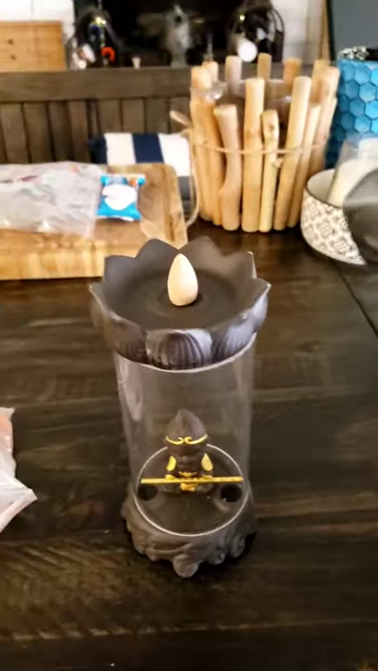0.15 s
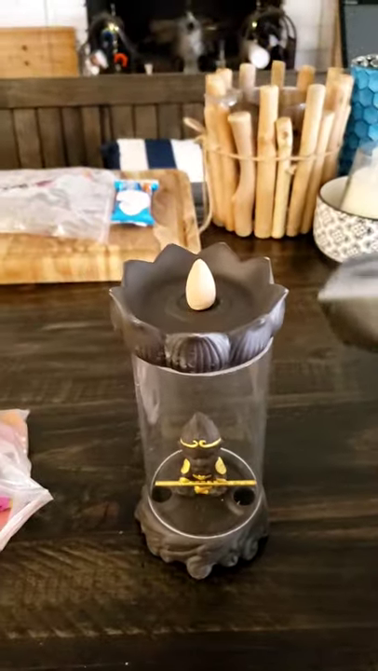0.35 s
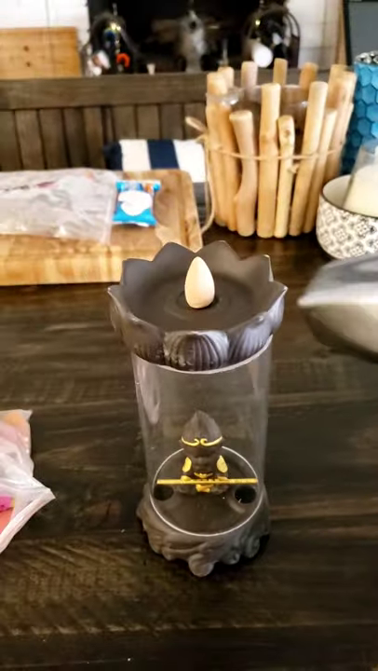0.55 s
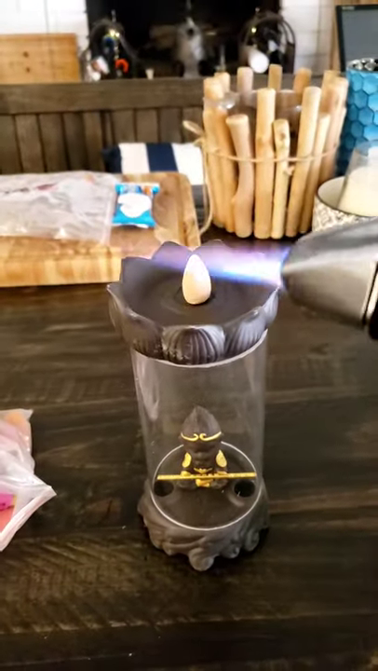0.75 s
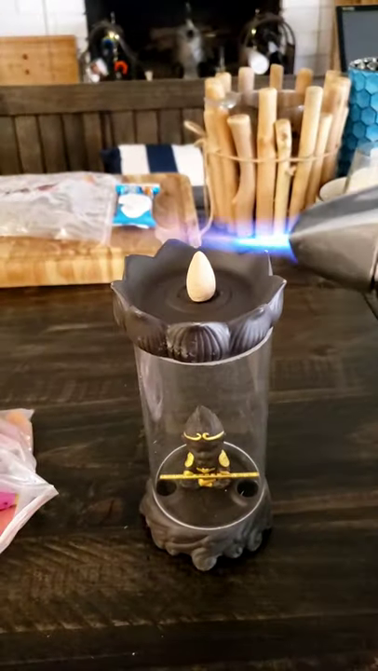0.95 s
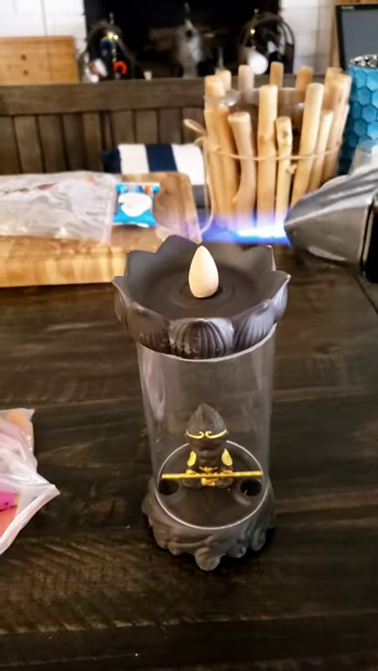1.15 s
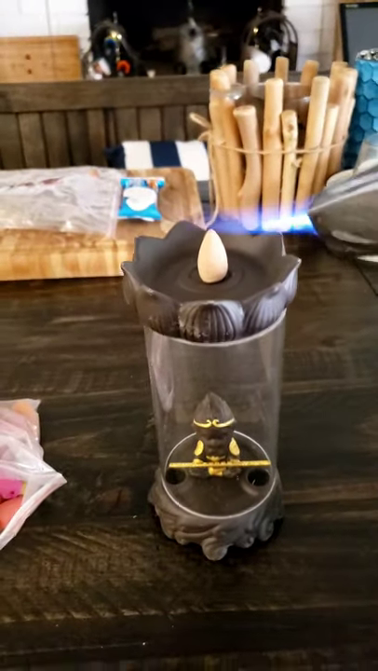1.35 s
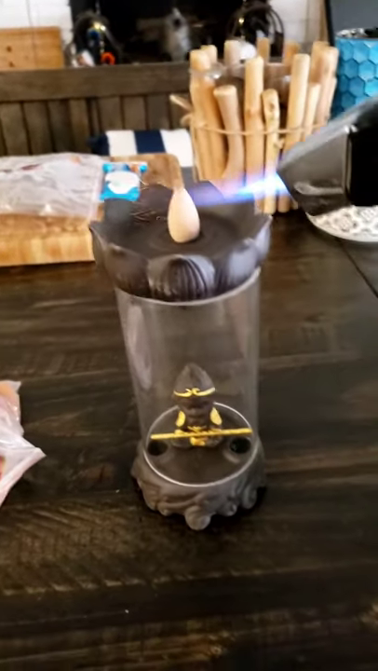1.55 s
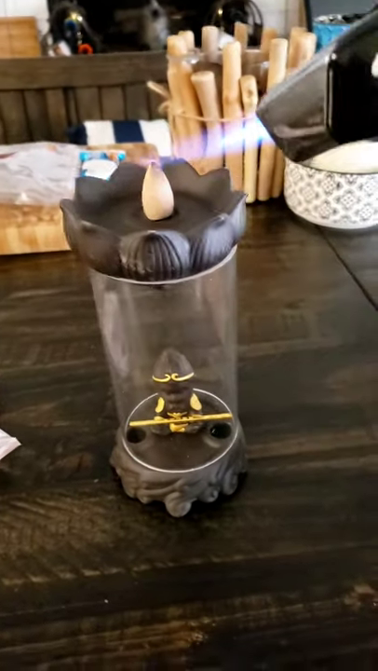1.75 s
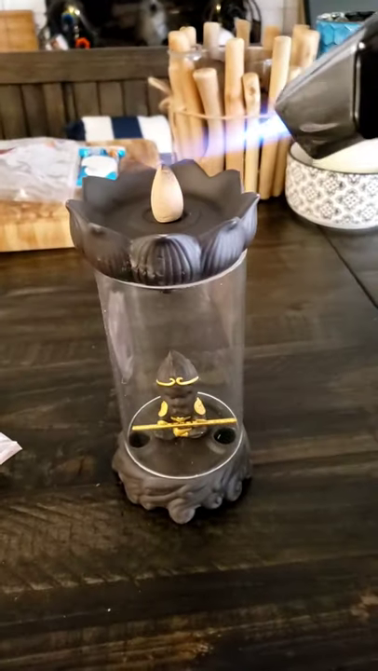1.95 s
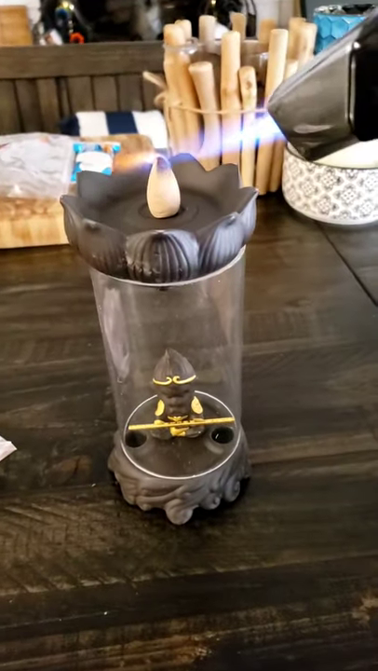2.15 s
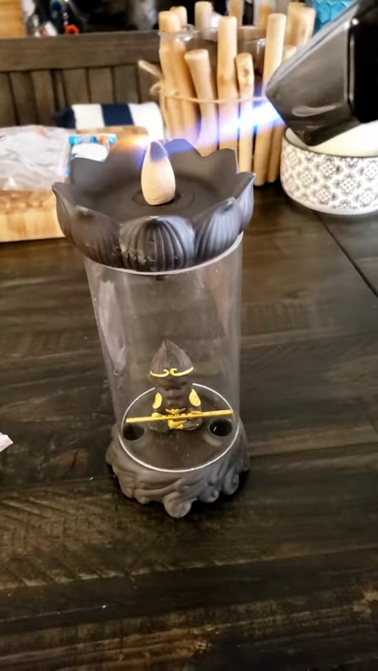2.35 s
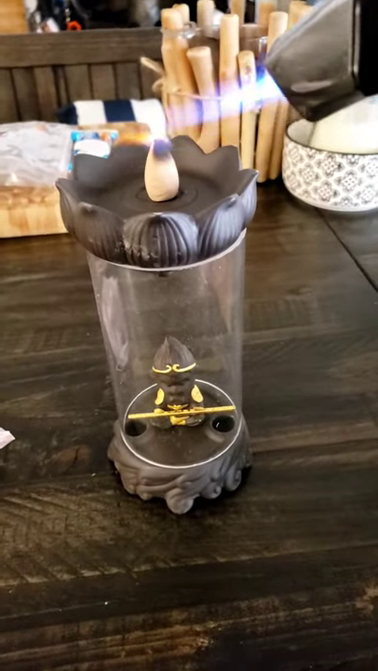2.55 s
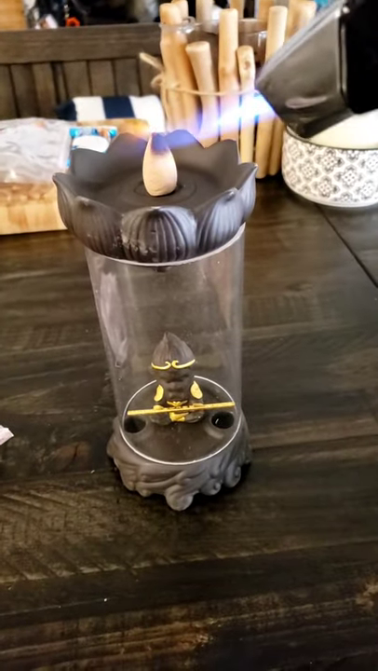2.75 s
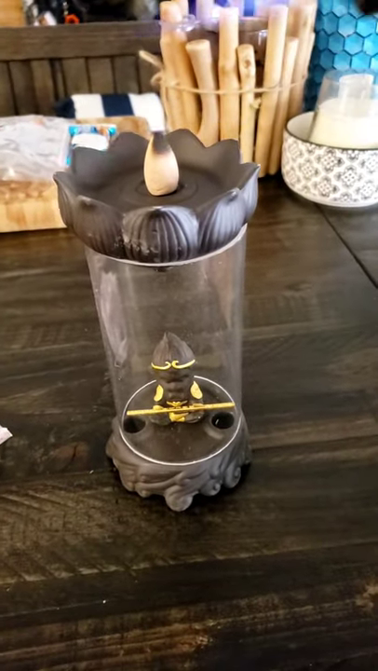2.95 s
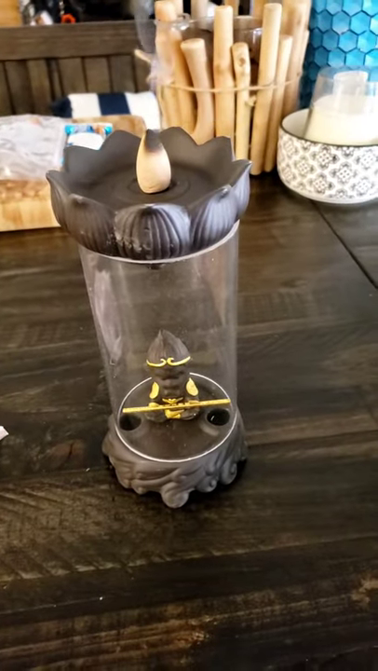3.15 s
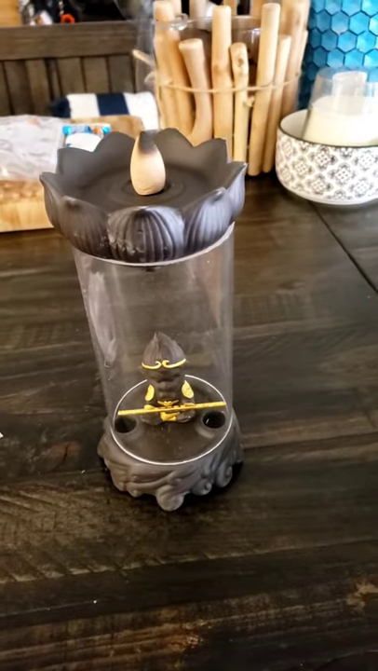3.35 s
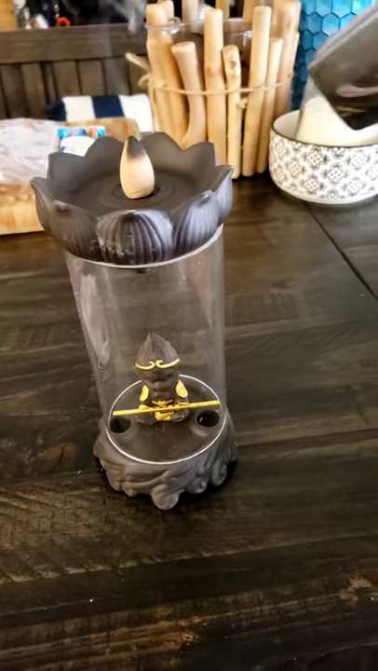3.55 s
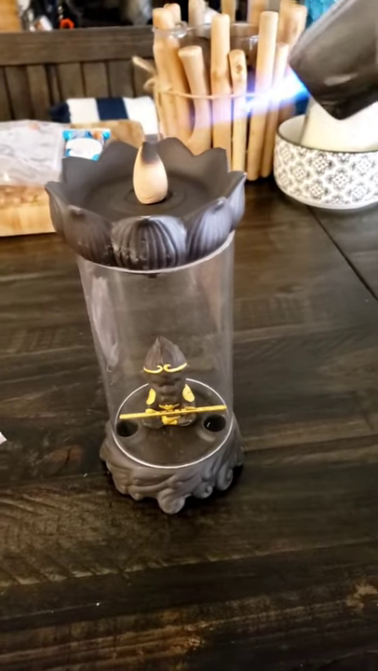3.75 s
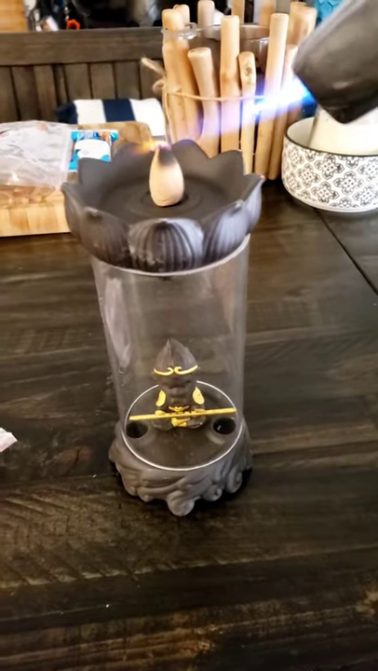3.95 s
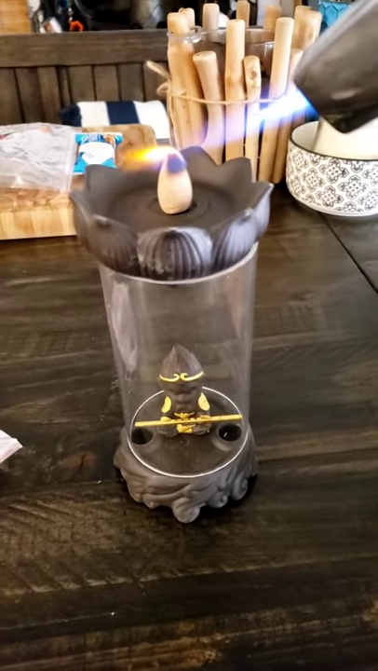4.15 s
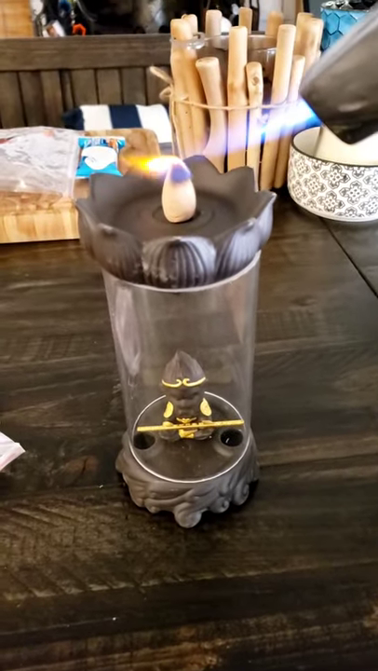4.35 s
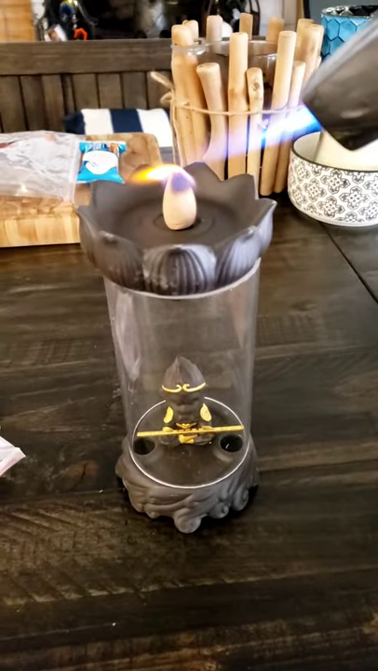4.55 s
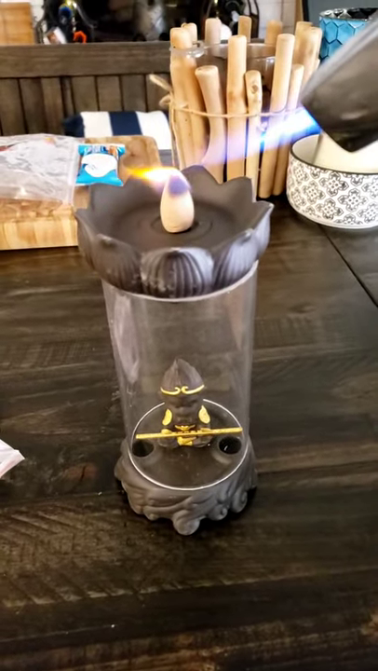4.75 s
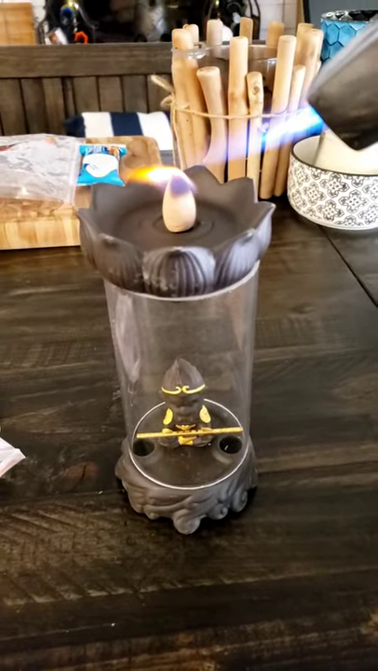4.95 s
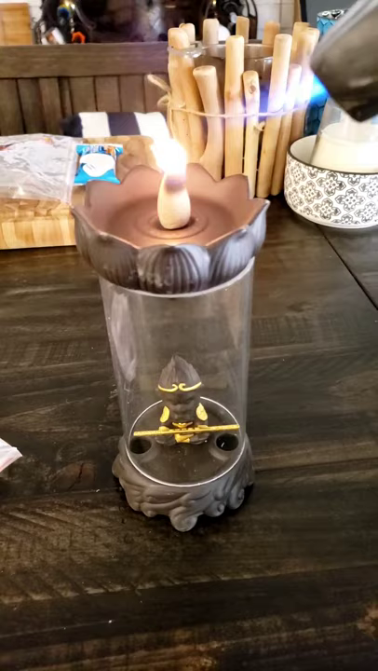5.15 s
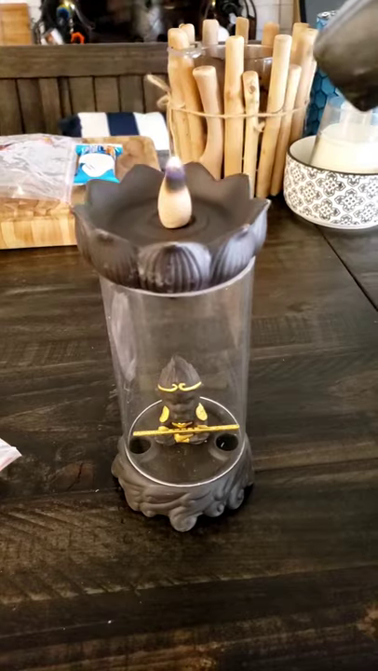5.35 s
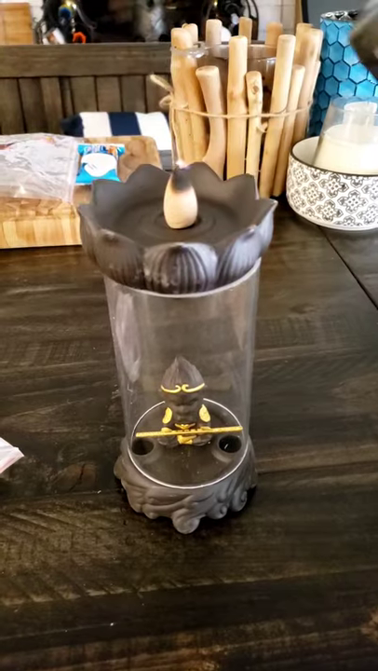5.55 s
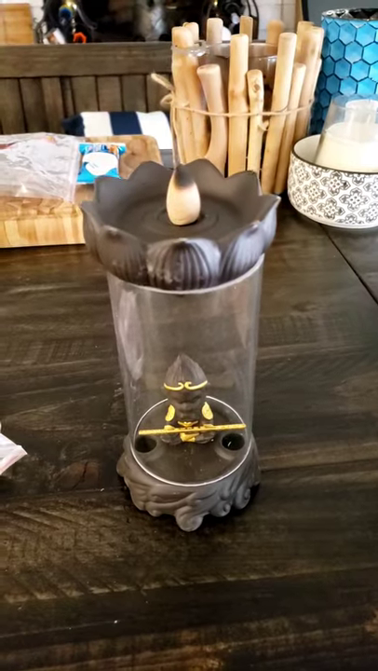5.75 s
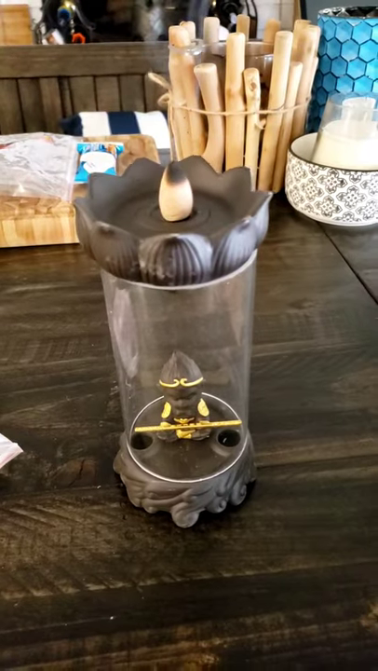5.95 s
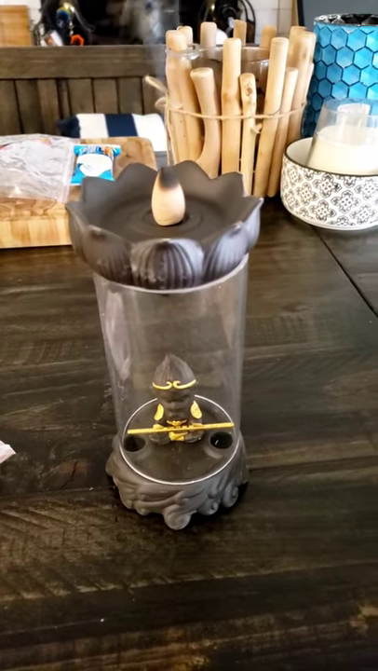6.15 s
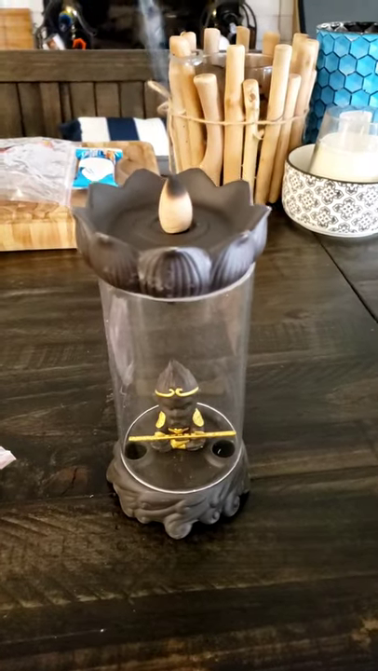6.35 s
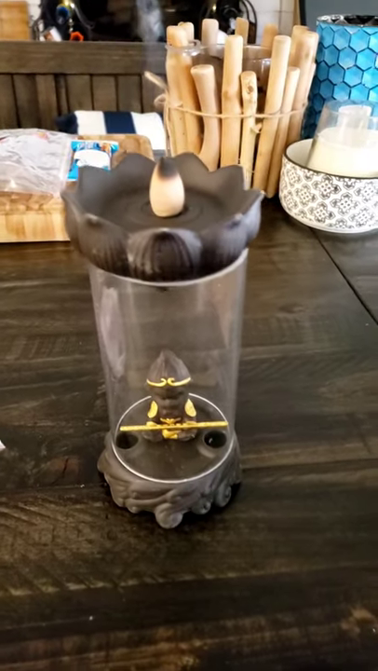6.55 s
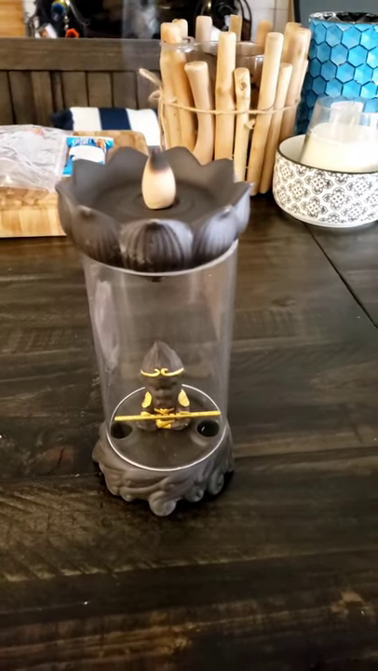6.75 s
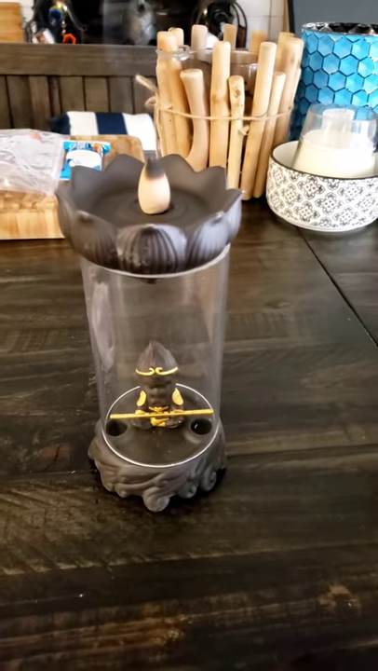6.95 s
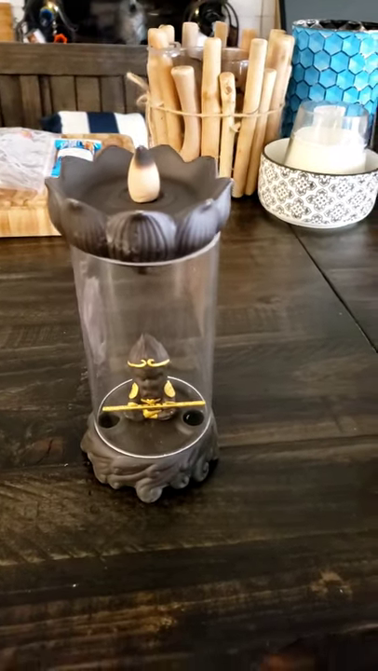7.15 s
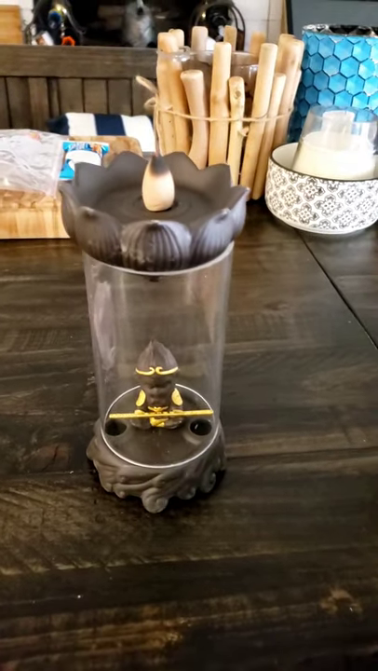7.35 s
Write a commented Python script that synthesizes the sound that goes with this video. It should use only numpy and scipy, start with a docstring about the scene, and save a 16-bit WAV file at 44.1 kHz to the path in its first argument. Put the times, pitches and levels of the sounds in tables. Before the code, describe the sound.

A low, beating machine hum with rumble and faint air fills a lively room, captured in stereo by a nearby phone. Faint handling taps come at 0.1 s. Gas hisses from 0.3 to 0.6 s, with small lever clicks and a hard metallic snap at 0.39 that does not light; a click and dull knock follow at 0.59. Around 0.7 a very high whistle chirps, then at 0.75 a sharp snap and deep pop ignite a rough, breathy jet, strongest at first, with a thin ringing whine. Clicks at 2.96, 3.06 and 3.12 shut it abruptly. At 3.68 a fainter whistle, then a softer snap and pop at 3.76, start a quieter roar. Clicks from 5.02 lead to its cutoff at 5.28. The hum, pushed down by loud moments, swells back from around 5.3 to 6.2 s; a faint rub and tap come near 7.1 to 7.3.

```python
"""Over a low machine hum, a butane jet lighter nears an incense cone on a wooden table, left of a phone.
Gas hisses and the piezo trigger snaps in vain; then a whistle, a snap and a pop light a roaring jet.
The trigger clicks back and it dies; another whistle and snap light it again, until more clicks end it.
A live room answers each snap, made of ringing noise bursts; flame and gas are coloured noise.
Loud moments make the phone turn its gain down, so the hum sinks and later swells back."""
import sys
import numpy as np
from scipy import signal
from scipy.fft import rfft, irfft
from scipy.io import wavfile
from scipy.ndimage import uniform_filter1d, map_coordinates

SR = 44100
rng = np.random.default_rng(int(sys.argv[2]) if len(sys.argv) > 2 else 0)


def master_out(mix):
    """Clip the mix to full scale and print it as 16-bit PCM to the path in sys.argv[1]."""
    frames = np.transpose(np.atleast_2d(mix))
    ceiling = np.clip(frames, -1, 1)
    pcm = np.round(ceiling * 32767).astype(np.int16)
    wavfile.write(sys.argv[1], SR, pcm)


N = 327222
TIME = np.arange(N) / SR
FREQ = np.fft.rfftfreq(N, 1 / SR)


def amp(db):
    """Decibels to gain."""
    return 10 ** (np.asarray(db) / 20)


def unit(x):
    """Scale to rms 1."""
    return x / np.sqrt(np.mean(x ** 2))


def curves(table):
    """The columns of a table, joined by straight lines in time."""
    s, *columns = np.transpose(table)
    return [np.interp(TIME, s, column) for column in columns]


def spectrum(points, hz=FREQ):
    """Colour points joined on a log-frequency axis."""
    f, value = np.transpose(points)
    return np.interp(np.log(hz + 1), np.log(f), value)


def lifts(modes, hz=FREQ):
    """Decibels added by resonances."""
    return sum(db / (1 + (2 * (hz - f) / width) ** 2) for f, width, db in modes)


def noise(db):
    """Noise of rms 1 with the given colour."""
    white = rng.standard_normal(N)
    return unit(irfft(rfft(white) * amp(db), N))


def walk(rate):
    """Smooth random drift of rms 1 that moves about rate times a second."""
    return noise(-20 * np.log10(1 + (FREQ / rate) ** 4))


def narrow(hz, width_hz):
    """Turbulence caught in one sharp resonance whose pitch may move; rms about 1."""
    slow = -10 * np.log10(1 + (2 * FREQ / width_hz) ** 4)
    phase = 2 * np.pi * np.cumsum(hz * np.ones(N)) / SR
    return noise(slow) * np.cos(phase) + noise(slow) * np.sin(phase)


def envelope(start_s, end_s, attack_s, fade_db_per_s):
    """Gain that rises from the start, holds, and fades after the end."""
    rise = np.clip((TIME - start_s) / attack_s, 0, 1)
    return rise * amp(-fade_db_per_s * np.clip(TIME - end_s, 0, 1))


def delay(x, ms):
    """Read a sound a fixed or moving time late."""
    return map_coordinates(x, [np.arange(N) - ms * SR / 1000], order=3)


def ring(db):
    """Causal impulse response of a colour, by way of its cepstrum; unit energy."""
    cepstrum = irfft(np.log(amp(db)))
    half = len(cepstrum) // 2
    # folding the cepstrum forward in time gives minimum phase
    folded = np.r_[cepstrum[0], 2 * cepstrum[1:half], np.zeros(half)]
    response = irfft(np.exp(rfft(folded)))[:half]
    return response / np.linalg.norm(response)


def blow(ms, colour_db):
    """A dying rattle of tiny contacts rings a body; a longer rattle carries more energy."""
    t = np.arange(SR // 6) / SR
    contacts = rng.standard_normal(len(t)) * np.exp(-1000 * t / ms)
    contacts = contacts / np.linalg.norm(contacts) * np.sqrt(ms * SR / 2000)
    return signal.fftconvolve(contacts, ring(colour_db))


def add(track, s, sound):
    """Mix a short sound into a track at time s."""
    start = max(int(s * SR), 0)
    track[..., start:start + sound.shape[-1]] += sound[..., :N - start]


def pan(db):
    """Left and right gains for a level difference."""
    return amp(np.array([[db], [-db]]) / 2)


def ports(x, lag_ms=.27):
    """The right port hears a source on the left a little later."""
    return np.array([x, delay(x, lag_ms)])


# colour of the level difference between the ports: (frequency [Hz], left minus right [dB])
PORT_BALANCE = [(110, 4), (380, 0.5), (700, 12), (1300, 4), (2400, 7), (4400, 3.5), (8100, 2),
                (14500, -3.5)]


def sides(stereo, share=1):
    """The left port is stronger in the middle range, the right one in the top."""
    half_difference_db = np.outer([1, -1], spectrum(PORT_BALANCE)) / 2
    return irfft(rfft(stereo) * amp(share * half_difference_db), N)


# how long the room rings: (frequency [Hz], time to fall 60 dB before the early lift [s])
ROOM_DECAY = [(150, 0.095), (600, 0.49), (2500, 0.5), (6000, 0.58), (13000, 0.43)]


def room(x, build_s=0.0051, early_db=4, early_s=.03):
    """Diffuse noise tail: strong early reflections, then a decay that is shortest in the bass."""
    hz, s, cells = signal.stft(rng.standard_normal((2, SR)), SR, nperseg=256)
    decay = np.exp(-np.log(1000) * s / spectrum(ROOM_DECAY, hz)[:, None])
    tail = signal.istft(cells * decay, SR)[1]
    t = np.arange(tail.shape[1]) / SR
    build = 1 - np.exp(-(t / build_s) ** 2)
    tail = tail * build * amp(early_db * np.exp(-t / early_s))
    # the left tail has unit energy
    return signal.fftconvolve(x[None], tail / np.linalg.norm(tail[0]), axes=1)[:, :N]


# the jet burns: (lights [s], valve shuts [s], level [dB], extra level at first [dB])
BURNS = [(.746, 3.129, -42, 5.5), (3.76, 5.285, -44.5, 1)]
# turbulent roar of the flame, hiss of the gas: (frequency [Hz], relative level [dB])
ROAR_COLOUR = [(50, -23.5), (120, 6.5), (230, 4.5), (350, -4), (500, -7.5), (700, -5.5), (1000, -4),
               (1600, -3.5), (2300, -8), (4000, -18), (9000, -26)]
HISS_COLOUR = [(800, -19.5), (2000, 4.5), (3200, -1.5), (5500, 1.5), (7000, -6), (8200, 0), (10200, -3),
               (11500, -9), (12800, 1), (14300, -8.5)]
# resonances of the burner tube: (frequency [Hz], width [Hz], lift [dB])
BURNER_TUBE = [(1063, 240, 7.5), (1440, 220, 5), (2780, 130, 7.5), (5520, 720, 5), (11700, 400, 7.5)]
# the gap between flame and holder rings at a pitch that follows the hand: (time [s], pitch [Hz])
GAP_PITCH = [(1.2, 3400), (1.65, 3980), (3.1, 3906), (3.9, 3800), (4.6, 3740), (5.3, 3800)]
# the flame catches fast, sounds louder at first and eases down slowly, and dies with a last spit of gas
CATCH_S, EASE_S, DIE_DB_PER_S, SPIT_DB, SPIT_S = 0.018, 0.57, 418, 5.5, 0.03


def jet(flutter_db=1.02, echo=0.14, echo_cycles=3.5, hiss_db=-11, gap_db=-19.0, gap_width_hz=170,
        roar_room_db=-6, hiss_room_db=-2):
    """Flame roar and gas hiss pass through the burner tube; the gap to the holder adds echo and ring."""
    burn, gas = np.zeros(N), np.zeros(N)
    for start, end, db, flare_db in BURNS:
        easing = np.exp(-np.maximum(TIME - start, 0) / EASE_S)
        flame = envelope(start, end, CATCH_S, DIE_DB_PER_S) * amp(db + flare_db * easing)
        spit = amp(SPIT_DB * np.exp(-np.abs(TIME - end) / SPIT_S))
        burn += flame
        gas += flame * spit
    gap_hz, tube = curves(GAP_PITCH)[0], lifts(BURNER_TUBE)
    roar = burn * noise(spectrum(ROAR_COLOUR) + tube) * amp(flutter_db * walk(60))
    hiss = gas * noise(spectrum(HISS_COLOUR) + tube) * amp(hiss_db + .5 * walk(15))
    echo_ms = 1000 * echo_cycles / gap_hz
    # the near echo comes back inverted
    roar = roar - echo * delay(roar, echo_ms)
    hiss = hiss - echo * delay(hiss, echo_ms)
    gap = burn * narrow(gap_hz, gap_width_hz) * amp(gap_db)
    # the jet points at the things on the table, so most of its reflections come early
    reflected = room(amp(roar_room_db) * roar + amp(hiss_room_db) * hiss, early_db=8)
    return sides(ports(roar + hiss + gap) + reflected)


# unlit gas escapes as the trigger travels:
# (valve opens [s], flow starts to fade [s], level [dB], opening time [s])
LEAKS = [(0.317, 0.6, -41, 0.066), (0.688, .742, -45.5, .04), (3.679, 3.77, -53, 0.038)]
# the barely open valve whistles, each time a chirp and then a stronger note:
# (time [s], length before the fade [s], level at full rise [dB], fade [dB/s])
WHISTLES = [(.684, .006, -48, 1499), (0.705, 0.0077, -30.5, 900), (3.682, 0.011, -42, 2497.5),
            (3.702, 0.011, -38, 518)]
WHISTLE_HZ, WHISTLE_ATTACK_S, LEAK_FADE_DB_PER_S = 11420, .007, 421


def valve(waver_hz=110, tube_db=-9, tube_hz=2790, tube_width_hz=260, room_db=-10):
    """Unlit gas hisses, sounds the burner tube and whistles on the edge of the nozzle."""
    leaking = sum(amp(db) * envelope(start, end, opening_s, LEAK_FADE_DB_PER_S)
                  for start, end, db, opening_s in LEAKS)
    whistling = sum(amp(db) * envelope(s, s + length, WHISTLE_ATTACK_S, fade)
                    for s, length, db, fade in WHISTLES)
    whistle_hz = WHISTLE_HZ + waver_hz * walk(400)
    tone = np.sqrt(2) * np.sin(2 * np.pi * np.cumsum(whistle_hz) / SR)
    leak = unit(noise(spectrum(HISS_COLOUR)) + amp(tube_db) * narrow(tube_hz, tube_width_hz))
    gas = leak * leaking * amp(2 * walk(120)) + tone * whistling * amp(1.5 * walk(300))
    return ports(gas, lag_ms=.28) + amp(room_db) * room(gas)


def strikes(hits, shape, modes, scatter, size=2048, lag_ms=.2):
    """Parts of the lighter strike its case; the table scatters the snap and the room answers."""
    hz = np.fft.rfftfreq(size, 1 / SR)
    near, scattered, far = np.zeros((2, N)), np.zeros((2, N)), np.zeros(N)
    for s, db, ms, tilt_db, room_db, pan_db in hits:
        tilt = tilt_db * np.log2(np.maximum(hz, 500) / 3000)
        colour = spectrum(shape, hz) + lifts(modes, hz) + tilt
        snap, left, right = (amp(db) * blow(ms, colour) for _ in range(3))
        add(near, s, snap * pan(pan_db))
        add(scattered, s, scatter * np.array([left, right]) * pan(pan_db))
        # the room gathers the snap from all directions, which evens out its colour
        add(far, s, amp(room_db) * np.linalg.norm(snap) * ring(colour))
    direct = np.array([near[0], delay(near[1], lag_ms)])
    return (direct + scattered) / np.hypot(1, scatter) + room(far)


# the piezo hammer fires: (time [s], level [dB], rattle time constant [ms],
# treble tilt [dB/octave], room [dB], left minus right [dB])
SNAPS = [(.3868, -5, 1.65, 1, 1, -0.5), (.7463, -6.5, 2.84, 1.1, 0, -7.5), (3.7595, -13, 2.56, 1.34, 5, 3)]
# colour of the hammer: (frequency [Hz], relative level [dB])
HAMMER_COLOUR = [(150, -9), (500, -11.5), (800, -11.5), (1300, -1), (2300, 5), (4200, 0.5), (5500, -3.5),
                 (9500, -6), (12000, 0), (14500, -1.5)]
# modes of the lighter's case: (frequency [Hz], width [Hz], lift [dB])
CASE_MODES = [(1180, 310, 6.3), (1916, 99, 6), (2460, 230, 8.2), (3180, 180, 4.5), (4460, 200, 1.3),
              (6100, 130, 3)]


def hammer():
    """The sprung piezo hammer hits and rings the case."""
    return sides(strikes(SNAPS, HAMMER_COLOUR, CASE_MODES, scatter=1.0), share=0.33)


# the trigger lever slips and springs back: (time [s], level [dB], rattle time constant [ms],
# treble tilt [dB/octave], room [dB], left minus right [dB])
CLICKS = [(0.3247, -49, 2.3, 4, -9, -9), (.3315, -39.5, 2.5, 0, -7, 10), (.346, -34, 4.7, 11, 7, 1),
          (.5905, -20.5, 2.9, -0.5, -5.5, 8.5), (2.9595, -18, 1.4, -1, -8, 2.5),
          (3.059, -26.5, 4.2, -3.5, -6, 4.5), (3.117, -14, 2, 0, -20.5, 4.5),
          (3.127, -28.5, 6, -4, -9.5, 5), (5.0208, -35, 2.3, -4.5, -6, 19.5),
          (5.1488, -25.5, 1.4, -0.5, -7, 6), (5.209, -38.5, 4, -2, -17, 13),
          (5.2757, -22.5, 3, -1, -16.5, 8)]
# colour of the lever: (frequency [Hz], relative level [dB])
LEVER_COLOUR = [(150, -7), (600, -10.5), (1500, -4.5), (2300, 1), (3400, -0.5), (5000, -3), (6500, -5.5),
                (9500, -8.5), (12000, -2.5), (14500, -9)]
# modes of the lever: (frequency [Hz], width [Hz], lift [dB])
LEVER_MODES = [(1070, 180, 8), (1953, 140, 9), (2883, 400, 12), (4600, 330, 3)]


def lever():
    """The trigger lever clicks with short rattles at its own modes."""
    return strikes(CLICKS, LEVER_COLOUR, LEVER_MODES, scatter=0.93)


# low thumps of the hand, the trigger and the catching gas:
# (time [s], level [dB], pitch [Hz], decay time constant [ms], left minus right [dB])
POPS = [(.101, -38.5, 210, 1.07, -16), (0.3875, -20.5, 54.75, 4.7, -0.5), (0.748, -8, 80.5, 4.6, 3.5),
        (3.7598, -22.5, 247, 2.4, 2.5), (3.764, -11.5, 73.6, 3.8, 6.5)]
# colour of the puff that comes with a pop: (frequency [Hz], relative level [dB])
PUFF_COLOUR = [(30, -10.5), (60, -0.5), (100, -5), (135, 2.5), (190, -19.5), (260, -13.5), (340, -25),
               (450, -26), (1500, -58)]


def pops(puff_db=-10, puff_ms=18, room_db=-14, size=8192):
    """A few swelling and dying swings of air pressure, with a turbulent puff."""
    t, track = np.arange(SR // 5) / SR, np.zeros((2, N))
    puff = spectrum(PUFF_COLOUR, np.fft.rfftfreq(size, 1 / SR))
    for s, db, hz, ms, pan_db in POPS:
        age = 1000 * t / ms
        swing = -age ** 2 * np.exp(-age) * np.sin(2 * np.pi * hz * t)
        add(track, s, amp(db) * swing * pan(pan_db))
        add(track, s, amp(db + puff_db) * blow(puff_ms, puff) * pan(pan_db))
    return track + amp(room_db) * room(track.mean(axis=0))


# soft knocks of handling:
# (time [s], level [dB], rattle time constant [ms], ring pitch [Hz], sharpness [Q])
KNOCKS = [(0.112, -43.5, 2.5, 1500, 4.2), (0.298, -58.5, 3, 1500, 1.5), (0.344, -30.5, 3.2, 1100, 1.2),
          (0.552, -29.5, 3.8, 1200, 0.76), (0.592, -22.5, 2.7, 1280, 2.4), (0.617, -41, 6.2, 1300, 2.2),
          (3.554, -57.5, 1.8, 2000, 0.91), (3.581, -48, 5.8, 1130, 0.86), (5.6207, -53.5, 3.6, 1800, 2.3),
          (7.2635, -54.5, 5, 1200, 2.3)]
# a faint hollow rub of the fingers
RUB_START_S, RUB_END_S, RUB_DB, RUB_ATTACK_S, RUB_FADE_DB_PER_S = 7.07, 7.17, -72.5, 0.049, 219.5


def knocks(size=2048, room_db=-9, pan_db=5, overtone=1.7, overtone_db=-12, rub_hz=830, rub_width_hz=90):
    """Fingers shift and brush: dull blows with one ring and a weaker overtone, and a short rub."""
    hz = np.fft.rfftfreq(size, 1 / SR) + 1
    rubbing = envelope(RUB_START_S, RUB_END_S, RUB_ATTACK_S, RUB_FADE_DB_PER_S)
    track = narrow(rub_hz, rub_width_hz) * amp(RUB_DB) * rubbing
    for s, db, ms, ring_hz, q in KNOCKS:
        low, high = (1 / (1 + (q * (hz / f - f / hz)) ** 2) for f in (ring_hz, overtone * ring_hz))
        # the last term is a broad floor under both rings
        colour = 20 * np.log10(low + amp(overtone_db) * high + amp(-42.5))
        add(track, s, amp(db) * blow(ms, colour))
    return (ports(track) + amp(room_db) * room(track)) * pan(pan_db)


# machine hum: (frequency [Hz], rms level before drift and pan [dB])
HUM_TONES = [(59.3, -49), (83.8, -50.5), (89.4, -51.5), (134.6, -60), (168, -66), (306.8, -76),
             (360.3, -72.5), (431, -78)]
# hum and rumble ease off a little: (time [s], level [dB])
HUM_DRIFT = [(0, 2.3), (4.5, 1), (7.42, -1)]
# room rumble and air: (frequency [Hz], relative level [dB])
RUMBLE_COLOUR = [(20, -13), (35, -19.5), (55, -2), (75, 6), (105, -3), (140, -3.5), (200, -12.5),
                 (300, -15), (420, -24.5), (700, -30.5), (1500, -59)]
AIR_COLOUR = [(200, -7), (800, 7.5), (1300, -0.5), (2800, -1), (5000, -8), (8000, -9), (12000, -4),
              (14500, -4)]


def background(rumble_db=-53.5, air_db=-74.0, side_db=-8, pan_db=2.0):
    """Steady motor tones beat against each other over a low rumble and faint air."""
    hum = np.zeros(N)
    for hz, db in HUM_TONES:
        turns = np.cumsum(hz + .15 * walk(1)) / SR + rng.random()
        hum += np.sqrt(2) * amp(db + walk(2)) * np.sin(2 * np.pi * turns)
    middle, side = noise(spectrum(RUMBLE_COLOUR)), noise(spectrum(RUMBLE_COLOUR))
    rumble = middle + amp(side_db) * np.outer([1, -1], side)
    air = np.array([noise(spectrum(AIR_COLOUR)) for _ in range(2)])
    low = (hum + amp(rumble_db) * rumble) * amp(curves(HUM_DRIFT)[0]) * pan(pan_db)
    return low + air * amp(air_db)


def afterring(level_db=-55, fade_db_per_s=125):
    """At the start the room still rings from an earlier click: fading noise in the colour of the air."""
    tail = np.array([noise(spectrum(AIR_COLOUR)) for _ in range(2)])
    return tail * amp(level_db - fade_db_per_s * TIME)


def scene():
    """The lighter and its handling over the room's hum."""
    lighter = jet() + valve() + hammer() + lever()
    return lighter + knocks() + pops() + background() + afterring()


# the phone's gain control steps back at a loud sound, waits, then creeps up again
DUCK_DB, HOLD_S, RECOVER_DB_PER_S = 9.5, 2.096, 11
THRESHOLD_DB, DETECT_S, DUCK_ATTACK_S, LOOKAHEAD_S = -25, .04, .005, .013


def gain_control(x):
    """Each loud moment turns the gain down; it stays there for a while, then recovers at a steady rate."""
    power = uniform_filter1d(np.mean(x ** 2, axis=0), int(DETECT_S * SR))
    # shift the centred average so that it sees only the lookahead time ahead
    power = np.interp(TIME - DETECT_S / 2 + LOOKAHEAD_S, TIME, power)
    loud = power > amp(THRESHOLD_DB) ** 2
    last_loud_s = np.maximum.accumulate(np.where(loud, TIME, -np.inf))
    recovering_s = TIME - last_loud_s - HOLD_S
    cut_db = np.clip(DUCK_DB - RECOVER_DB_PER_S * recovering_s, 0, DUCK_DB)
    return x * amp(-uniform_filter1d(cut_db, int(DUCK_ATTACK_S * SR)))


TOP_HZ = 14600


def record(dry):
    """The phone rides its gain and cuts the top steeply with an elliptic low-pass."""
    low_pass = signal.ellip(10, .2, 70, TOP_HZ, fs=SR, output="sos")
    return signal.sosfilt(low_pass, gain_control(dry))


dry = scene()
out = record(dry)
master_out(out)
```